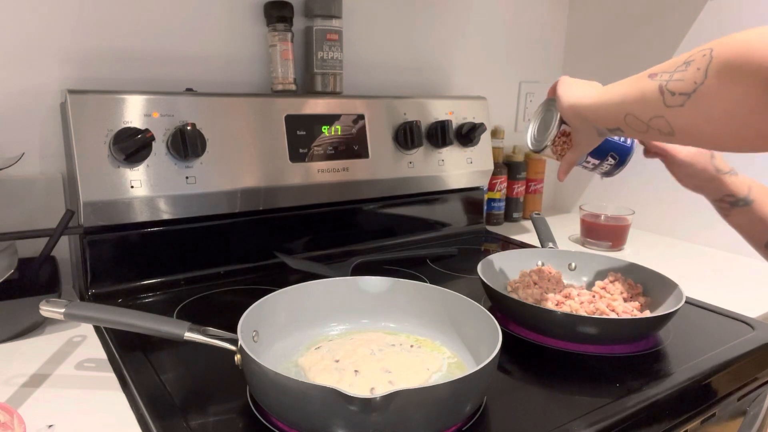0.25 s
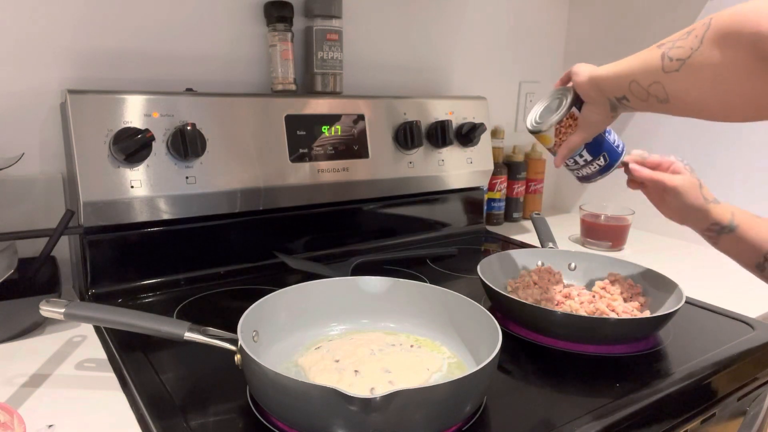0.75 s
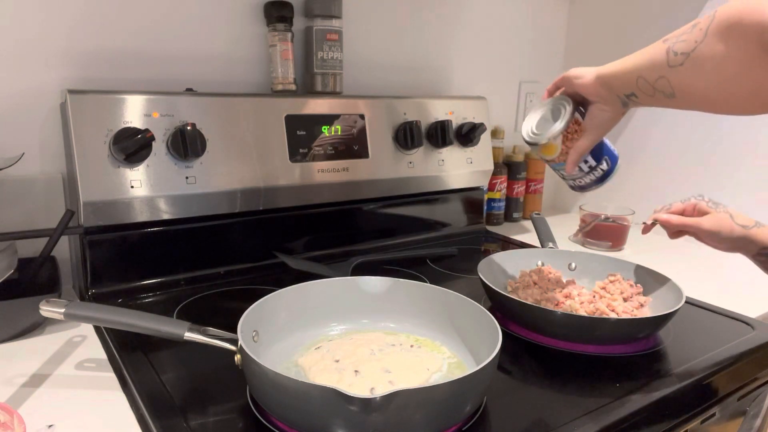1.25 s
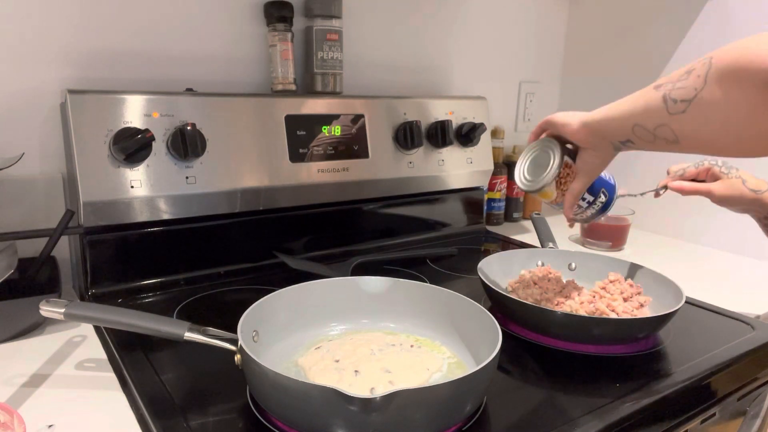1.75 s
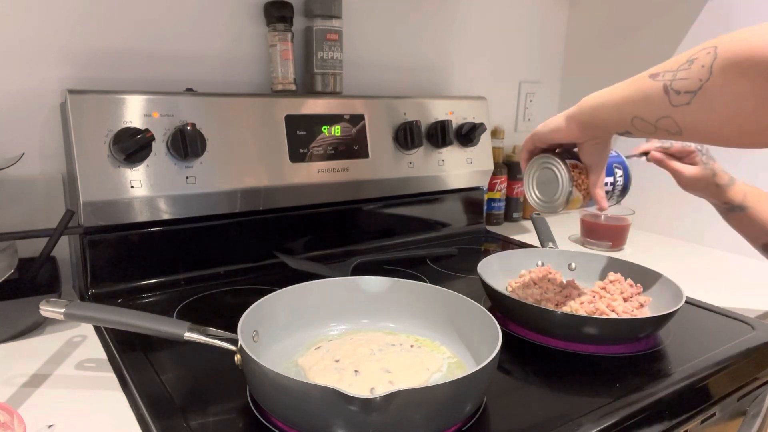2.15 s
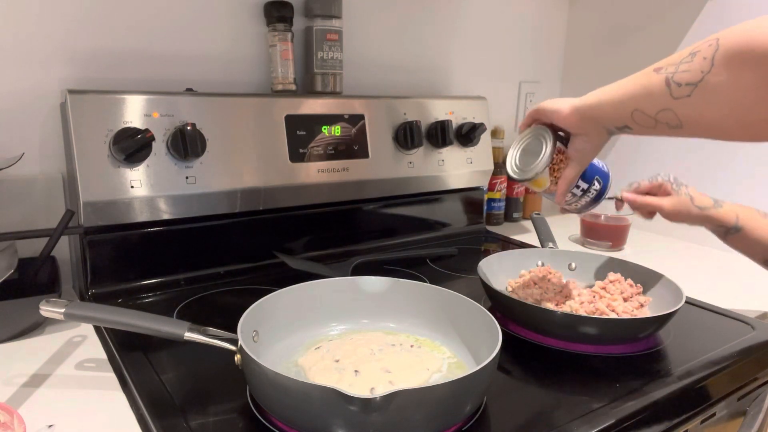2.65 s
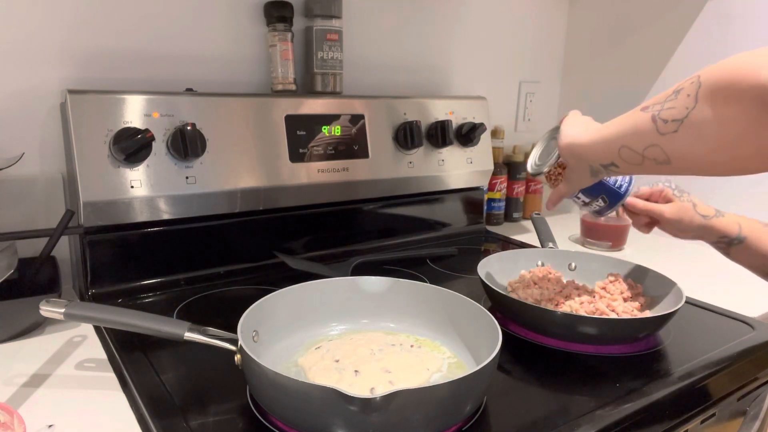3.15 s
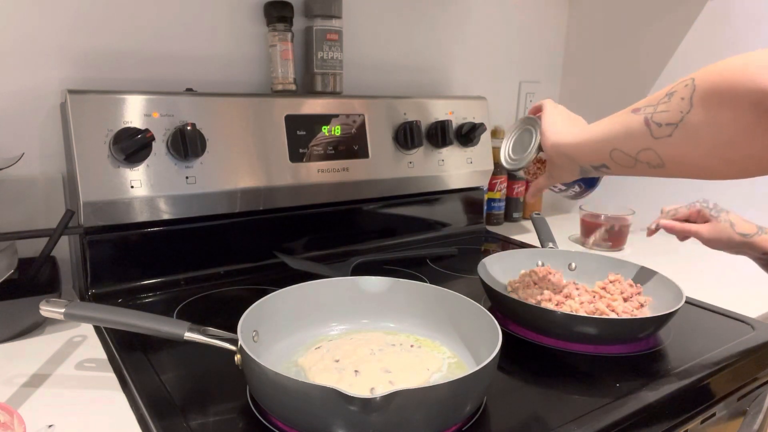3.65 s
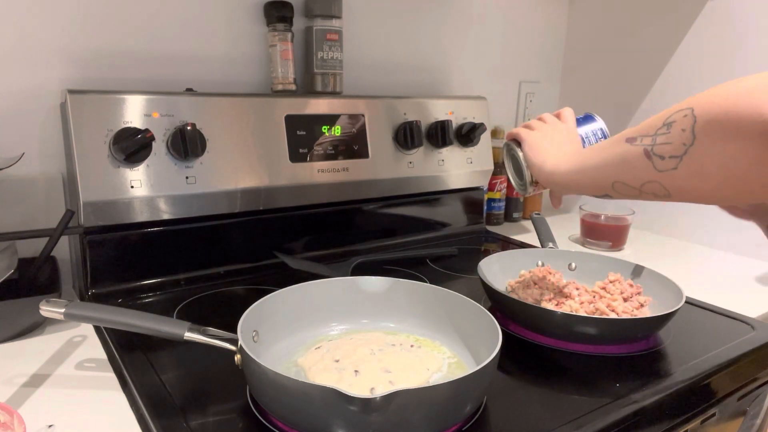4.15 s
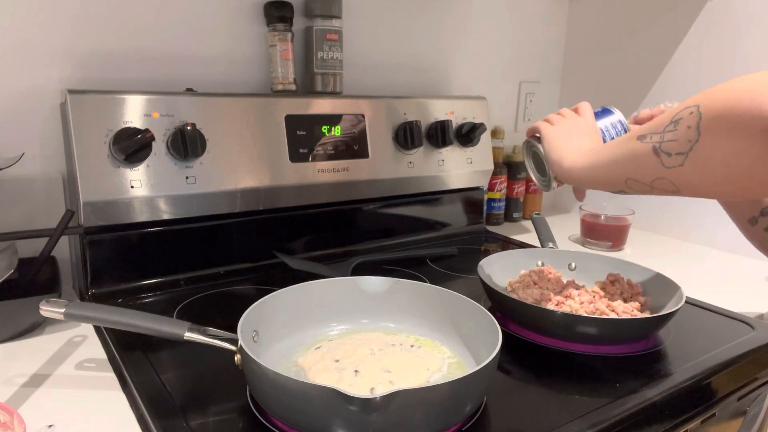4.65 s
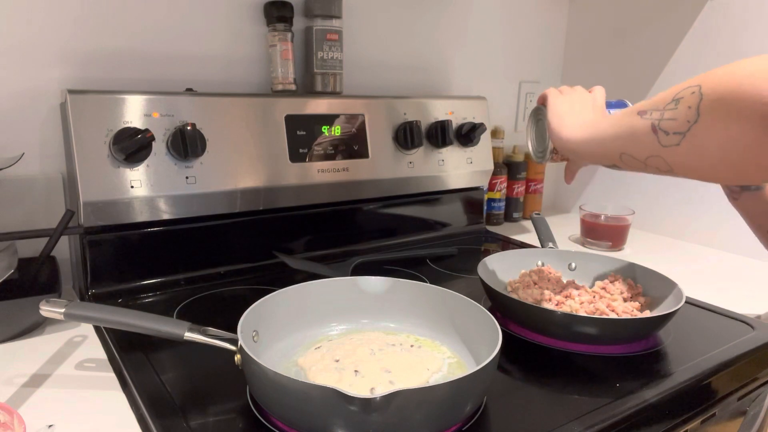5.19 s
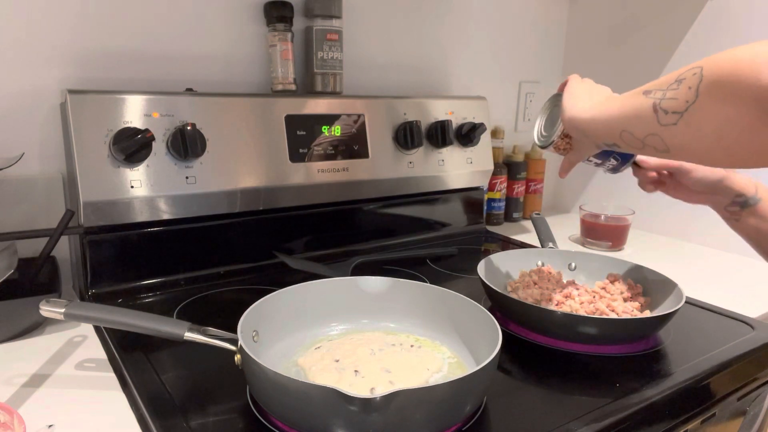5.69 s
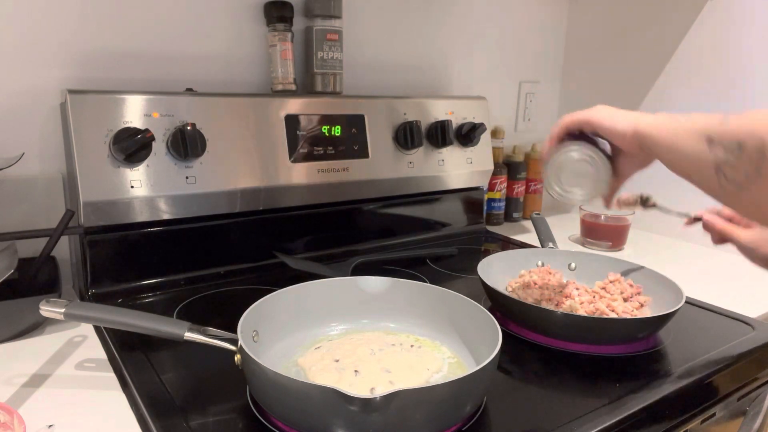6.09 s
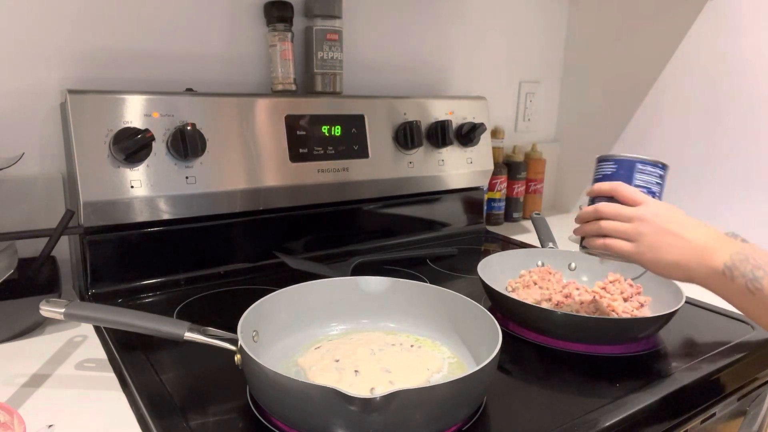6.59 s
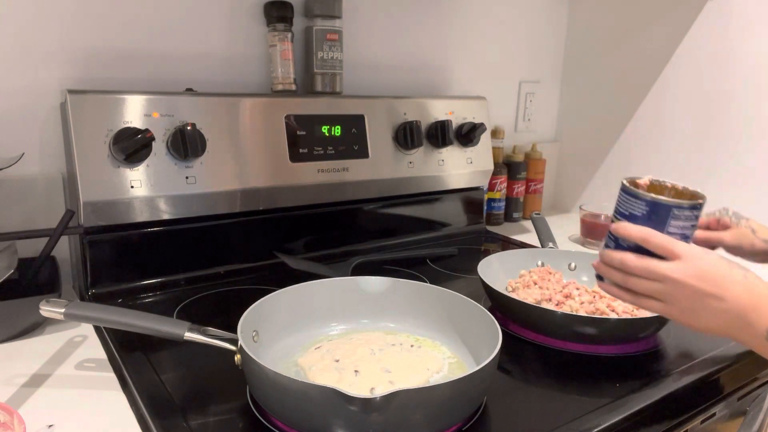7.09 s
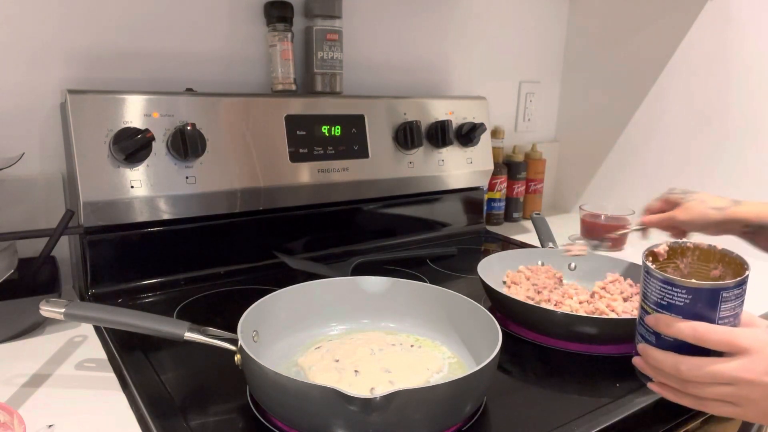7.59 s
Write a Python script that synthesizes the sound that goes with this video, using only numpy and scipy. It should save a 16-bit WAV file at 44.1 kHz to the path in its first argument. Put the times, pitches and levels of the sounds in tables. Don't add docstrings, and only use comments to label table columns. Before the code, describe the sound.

A close stereo pickup in a hard-surfaced kitchen, with soft room air and a faint low appliance hum that wavers. From 0 to 1 s a metal spoon scratches and taps inside a half-empty can, with a rougher scrape at 0.8. A clear hollow clank lands at 1.4, then a lull. From 2.05 to 2.65 knocks quicken into a bright tinny cluster, the strongest at 2.6; another dull knock comes at 3.0, followed by small scrapes until 3.4. After a quiet second, tinny clinks return at 4.5-4.85. More clanks gather at 5.35-5.45, with a tap at 5.64 and a short bright scrape at 5.75. After a pause, six much louder raps on the pan's rim run from 6.18 to 6.97, about 0.16 s apart, clangy with short ring and low thud, the last hardest. The ring fades into the room; barely audible can touches follow at 7.45 and 7.75.

```python
import sys
import numpy as np
from scipy import signal
from scipy.fft import rfft, irfft
from scipy.io import wavfile
from scipy.ndimage import uniform_filter1d

SR = 44100
rng = np.random.default_rng(int(sys.argv[2]) if len(sys.argv) > 2 else 0)


def volts_from_decibels(level):
    exponent = np.asarray(level, float) / 20
    return 10 ** exponent


def materialize(psi):
    bounded = np.clip(np.atleast_2d(psi).T, -1, 1)
    quanta = np.round(bounded * 32767).astype(np.int16)
    wavfile.write(sys.argv[1], SR, quanta)


N = 345303

# (frequency [Hz], density [dB per Hz])
AIR_SPECTRUM = [(15, -54.5), (30, -23), (59, -1.5), (130, -16), (217, -17.5), (330, -22), (560, -28),
                (840, -21), (1330, -35), (2200, -44), (3600, -49), (7500, -49.5), (10700, -50),
                (14500, -59.5)]
# (frequency [Hz], likeness [-1..1])
AIR_SAME = [(60, 0.92), (180, 0.77), (550, 0.047), (1650, -0.16), (4970, -0.36), (15000, 0.76)]
# (time [s], level [dB])
HUM_LEVEL = [(0.0, -45), (0.15, -40), (1.92, -60.5), (3.55, -37.5), (3.88, -65), (5.91, -66), (6.46, -34.5),
             (7.74, -49.5), (7.83, -71.5)]

# (frequency [Hz], t60 [s])
KITCHEN_T60 = [(150, 0.61), (600, 0.77), (2500, 0.85), (6000, 0.7), (12000, 0.43)]
# (frequency [Hz], likeness [0..1])
TAIL_SAME = [(100, 0.8), (300, 0.55), (800, 0.2), (4000, 0.1), (8000, 0.63), (12000, 1)]
# (frequency [Hz], level [dB])
COUNTER = [(150, -11.5), (400, -2.5), (700, -4.5), (1400, -5), (5000, -0.5), (12000, -5.5)]
# (frequency [Hz], likeness [0..1])
COUNTER_SAME = [(200, 0.61), (700, 0.43), (1500, 0.57), (4000, .3), (8000, 0.68), (13000, 0.83)]
# (frequency [Hz], phase [rad])
CAN_PHASE = [(100, 0), (1400, .9), (2100, 2.2), (2800, 4.2), (3500, 5.2), (6200, 5.4), (7000, 3.6),
             (8300, 2.7), (11500, .1), (14500, -2.9)]
# (frequency [Hz], phase [rad])
PAN_PHASE = [(100, 0), (700, .7), (1400, 1.5), (2100, 2), (3400, 2.1), (6500, 2.2), (8300, 2.5),
             (10300, 1.1), (12400, -.3), (14500, -2.1)]

# (time [s], blow [dB], thud [dB], tick [dB], clink of the spoon [dB])
RAPS = [
    (6.183, -8, -23, -34, -13),
    (6.3533, -6, -19.5, -20, -15),
    (6.5205, -4, -20.5, -17.5, -19),
    (6.6826, -7.5, -25.5, -25, -11.5),
    (6.8405, -4.5, -21.5, -21.5, -17),
    (6.9673, -3, -21.5, -14.5, -18.5),
]
# (frequency [Hz], level [dB], t60 [s])
PAN_LOW = [(236.8, 4, 0.18), (304, -14.5, 0.15), (143, -0.5, 0.11), (196, 0, 0.14), (503.9, -10.5, 0.48),
           (598, -10.5, 0.19)]
# (frequency [Hz], level [dB], t60 [s])
PAN_BOWL = [(1185, 1.5, 0.16), (1380, -0.5, 0.2), (1495, -4.5, 0.25), (1810, 5.5, 0.22), (2019, 5, 0.2),
            (870, -19, 0.047)]
# (frequency [Hz], level [dB], t60 [s])
PAN_RIM = [(2458, -2.5, 0.2), (2597, -1, 0.2), (2756, -8, 0.2), (3229, -4.5, 0.42), (3180, -14, 0.12),
           (3985, -8, 0.2), (3939, -7, 0.35), (5582, -12, 0.3), (2284, -11, .3), (7316, -8.5, .15),
           (6056, -11, 0.25), (6510, 4, 0.027), (6570, 2.5, 0.09), (6790, 17, 0.044), (7000, -13.5, .1),
           (7605, -12.5, 0.13), (8921, -29, 0.4), (9130, -29.5, .18), (10450, -26.5, 0.54), (11900, -27, 1),
           (12800, -29, 0.096)]
# (frequency [Hz], level [dB], t60 [s])
SPOON = [(4728, -2.5, 0.09), (4724, -15, 0.3), (4797, -23.5, .4)]
# (frequency [Hz], level [dB])
CRACK = [(60, -51.5), (300, -42), (1200, -12.5), (1700, -25), (2500, -13), (3200, -16), (3800, -25),
         (4300, -26.5), (5200, -21.5), (6500, -10), (8300, -26), (11000, -25.5), (13000, -40), (16000, -59)]
# (frequency [Hz], level [dB])
THUD = [(50, -57), (95, -16), (140, -7.5), (240, -5.5), (310, -15.5), (450, -11), (700, -16.5), (1100, -31),
        (2000, -60.5)]
# (frequency [Hz], level [dB])
TICK = [(5000, -35.5), (7500, -0.5), (8300, -0.5), (10000, 0.5), (12000, -8.5), (14000, -10.5),
        (16000, -46.5)]

# (full pressure from [s], held [s], pressure [dB],
# can air above it [dB], fizz above it [dB])
STROKES = [(0.0, 0.0081, -39, -0.5, -1.5), (0.423, 0.026, -30.5, -2.5, 2.5), (.458, 0.025, -38, -7, -5),
           (0.818, 0.092, -25.5, -0.5, -2), (2.359, 0.08, -46, 2, -12), (2.45, 0.023, -41, -7, -9),
           (2.51, 0.045, -56, 16, -21), (3.061, 0.014, -36, 8.5, -12), (3.107, .004, -38, -30, -18),
           (3.28, 0.031, -39.5, -2.5, -9), (3.33, 0.021, -43, 9, -16), (3.362, 0.024, -34, 3, -5.5),
           (4.542, 0.018, -44.5, -22, -22), (4.686, 0.021, -36.5, -32, 1.5), (4.745, .01, -56, -21, -6),
           (4.832, 0.017, -47, -31, 10.5), (5.085, 0.032, -55.5, -21, 2.5), (5.38, .005, -44, -8, -12),
           (5.47, 0.0049, -43, 0, 3), (5.672, 0.0059, -39.5, -9, -4), (5.714, 0.035, -48, -23, -20),
           (5.753, 0.073, -30, -2, 0.5), (7.446, 0.072, -60, -20, 1), (7.715, 0.11, -67.5, -16.5, 1.5)]
# (from [s], length [s], level [dB], frequency [Hz])
WHISTLES = [(0.42, 0.024, -38, 4000), (0.435, 0.055, -44.5, 2350), (0.81, 0.1, -43, 4010),
            (0.81, 0.06, -39.5, 5050), (.862, 0.05, -43.5, 4700), (0.823, 0.077, -49, 6000),
            (0.84, 0.084, -48, 10700), (2.7, 0.021, -49, 2900), (3.335, 0.055, -45, 4670),
            (3.25, 0.11, -56, 830), (3.1, .05, -57, 2650), (3.353, 0.028, -42, 6540),
            (3.35, 0.048, -48, 1020), (1.784, 0.27, -61.5, 730), (1.78, 0.28, -70.5, 1460),
            (4.52, 0.076, -58, 400), (5.638, 0.046, -46.5, 370), (4.676, 0.021, -38.5, 3700),
            (4.724, 0.16, -51.5, 2870), (4.696, 0.031, -39.5, 4600), (4.81, 0.024, -50, 5570),
            (5.705, 0.024, -50, 5700), (5.752, 0.038, -47, 5400), (5.764, 0.075, -42, 4200),
            (5.76, .08, -45.5, 3750), (5.77, .07, -46, 5500), (5.769, 0.041, -55.5, 6550)]
# (frequency [Hz], level [dB], t60 [s])
STROKE_AIR = [(680, 0, .07)]
# (frequency [Hz], level [dB])
RASP = [(65, -46), (110, -11.5), (251, -20), (415, -8.5), (520, -20), (638, -5), (736, -14.5), (835, -24),
        (1020, -24.5), (1400, -24.5), (2200, -18.5), (2980, -20.5), (4840, -24.5), (8000, -40.5),
        (10400, -31), (17600, -120)]
# (frequency [Hz], level [dB])
FIZZ = [(5000, -27.5), (5900, -15), (6900, -5.5), (7500, -3), (8600, -2), (9400, -0.5), (10300, -4),
        (12000, -10), (14000, -10), (16000, -40)]

# (time [s], blow [dB], can air above it, by depth of the spoon [dB],
# tick above it, by how much edge meets the wall [dB])
KNOCKS = [(0.2608, -47.5, -7, -20), (0.3381, -29.5, -3.5, -4), (0.4174, -27, -11, -1.5),
          (0.7472, -24, 0.5, -8.5), (0.943, -30.5, 3.5, -15), (1.4166, -20.5, -1, -8.5),
          (2.0622, -32, -7, -28), (2.1074, -27, -6.5, -11.5), (2.3331, -31.5, -3, -7),
          (2.5581, -26.5, -1, -9.5), (2.5785, -25.5, -3, -6.5), (2.6224, -18.5, -6.5, -7),
          (2.9851, -19, -7.5, -15), (3.048, -35.5, -1, -1.5), (3.1318, -27, -10.5, -10.5),
          (3.254, -38, -2.5, -12), (4.5191, -32.5, -12.5, -14), (4.5966, -37, -8, -5),
          (4.6083, -28, -1, -6), (4.6845, -34.5, -30, 3.5), (4.7111, -30, -36, -6), (5.1124, -43, -28, -25),
          (5.3058, -56, -9, -8), (5.3608, -25, -5.5, -27), (5.408, -37, -28, -6), (5.416, -27.5, -26, 0),
          (5.435, -22, 1, -11.5), (5.6396, -26, -5.5, -9), (6.0794, -60, -63, 0),
          (7.462, -56.5, -19.5, 8.5), (7.7892, -55, -17, -1.5)]
# (time [s], low mode [dB], its pitch [Hz], high mode [dB], its pitch [Hz])
CLANKS = [(0.34, -58, 1790, -61, 2600), (0.748, -49, 1520, -62.5, 2660), (1.4158, -27, 1385, -26.5, 2580),
          (2.064, -56.5, 1450, -60, 2870), (2.11, -56, 1515, -59, 2780), (2.332, -52.5, 1460, -75, 2900),
          (2.556, -40, 1587, -41.5, 2510), (2.581, -37.5, 1491, -46, 2265), (2.6216, -26, 1590, -22, 2430),
          (2.9836, -49, 1450, -44, 2400), (4.52, -48.5, 1505, -59, 2770), (4.6108, -23, 1550, -27.5, 2700),
          (4.6843, -66, 1580, -30.5, 2540), (4.7095, -37, 1570, -37, 2624), (5.3611, -26, 1540, -30, 2740),
          (5.4065, -35, 1495, -39, 2770), (5.437, -31, 1600, -25, 2550), (5.639, -32.5, 1784, -50, 2450)]
# (time [s], level [dB], pitch [Hz], level [dB], pitch [Hz])
PINGS = [(0.3386, -42.5, 5020, -50, 5500), (0.4183, -35, 3980, -45, 7330.0), (0.7467, -35, 4150, -44, 4870),
         (0.7466, -50, 5170, -46, 7350.0), (0.9425, -43, 3810.0, -58, 5000),
         (1.417, -32.5, 4570, -31.5, 5180), (1.4146, -35, 6550, -36, 7470), (2.0638, -44, 4520, -60, 5370),
         (2.1078, -52.5, 4450, -41.5, 5000), (2.3331, -53, 4340, -46, 4770), (2.433, -46, 3770, -52, 4650),
         (2.455, -56, 4290.0, -55, 4800), (2.472, -46, 3880, -53, 4670.0),
         (2.5581, -57, 3290.0, -57, 4330.0), (2.5593, -36, 4960, -51, 5400),
         (2.5785, -35.5, 3420, -49, 4280), (2.5783, -30.5, 5050, -50, 5360),
         (2.6213, -32.5, 3890, -37, 4230), (2.6224, -37, 4820, -37, 5270), (2.984, -41, 4900, -32, 5260),
         (2.985, -38, 6100, -36, 6900), (3.0609, -56, 4900, -58, 5450), (3.1318, -59, 4300.0, -56.5, 4700),
         (3.256, -63, 4570.0, -73, 5640), (4.5167, -59, 3860, -59, 5270), (4.598, -41, 3040, -58, 4300),
         (4.608, -32.5, 3060, -36, 4370.0), (4.6083, -38, 4970, -40, 7260), (4.6845, -44, 3700, -50, 4370),
         (4.6838, -37.5, 5270, -49, 7440), (4.7111, -40, 3520, -50, 3950.0),
         (4.7096, -50, 4560.0, -45, 7300), (5.363, -36, 3160.0, -35, 3900), (5.36, -35, 4400, -41, 5430),
         (5.408, -49, 3730, -49, 5000), (5.415, -32, 3920, -45, 4690.0), (5.435, -34, 3860.0, -42, 4370),
         (5.434, -31, 4770, -39, 6960), (5.641, -51, 4150, -39, 5860), (5.6396, -47, 6130, -49, 7000)]
# (time [s], frequency [Hz], level [dB], t60 [s])
RINGS = [(1.4172, 2560, -42, 0.39), (1.4162, 5000, -50, 0.35), (4.6092, 1500, -45.5, 0.61),
         (4.6093, 4900, -55, .3), (4.611, 388, -38, 0.09), (4.7102, 3700, -60, 0.51),
         (5.3602, 1485, -41, 0.34), (5.4362, 2420, -31.5, 0.27), (1.76, 3670, -73, 1.13),
         (1.4172, 5130, -53.5, .3), (1.4172, 1600, -50.5, 0.3), (0.0011, 3340, -57.5, 0.35),
         (3.052, 1014, -51, 0.13), (2.6224, 2430, -42, 0.3), (2.9, 4800, -70, 0.23), (3.1, 8400, -63, 0.32)]
# (share of the pitch, level [dB], t60 [s])
LOW_WALL = [(1, 0, .045), (.93, -5, .04), (1.06, -6, .04)]
# (share of the pitch, level [dB], t60 [s])
HIGH_WALL = [(1, 0, .04), (1.06, -3, .035), (.94, -3, .04)]
# (frequency [Hz], level [dB], t60 [s])
CAN_RIM = [(3510, -17, 0.0109), (4100, 10.5, 0.048), (4370, -1, 0.013), (4600, -13, 0.012),
           (5000, -7.5, 0.045), (5270, 0.5, 0.03), (5000, -28, 0.023), (6950, 29.5, 0.0062)]
# (frequency [Hz], level [dB])
SNAP = [(200, -36), (420, -21), (560, -26), (850, -9), (1300, -24), (2000, -12.5), (3000, -16), (5000, -12),
        (7000, -19), (10000, -20), (16000, -58.5)]


def evened(x):
    return x / np.sqrt(np.mean(x ** 2) + 1e-20)


def read(points, hz):
    f, value = np.transpose(points)
    return np.interp(np.log(hz + 1), np.log(f + 1), value)


def add(mix, s, sound):
    part = mix[round(s * SR):][:len(sound)]
    part += sound[:len(part)]


def coloured(x, spectrum):
    hz = np.fft.rfftfreq(len(x), 1 / SR)
    return irfft(rfft(x) * volts_from_decibels(read(spectrum, hz)), len(x))


def resonate(x, hz, width):
    turn = np.exp(2j * np.pi * np.cumsum(hz * np.ones(len(x))) / SR)
    r = np.exp(-np.pi * width / SR)
    return 2 * (turn * signal.lfilter([1 - r], [1, -r], x / turn)).real


def ring(modes, t, spread_db, detune, pitch=1):
    hz, db, t60 = np.transpose(modes)[:, :, None]
    chance = rng.standard_normal((2, len(modes), 1))
    sines = np.sin(2 * np.pi * pitch * hz * (1 + detune * chance[0]) * t)
    decay = volts_from_decibels(db + spread_db * chance[1] - 60 * t / t60)
    return (decay * sines).sum(0) / np.sqrt((volts_from_decibels(db) ** 2).sum())


def splash(spectrum, t, t60):
    return evened(coloured(rng.standard_normal(len(t)), spectrum)) * volts_from_decibels(-60 * t / t60)


def mixed(left, other, same):
    return np.array([left, same * left + np.sqrt(1 - same ** 2) * other])


def room_air():
    frames, hz = N // 512 + 5, np.fft.rfftfreq(2048, 1 / SR)
    a, b, c, d, patches = rng.standard_normal((frames, 1025, 5)).T
    patches = evened(uniform_filter1d(uniform_filter1d(patches, 12, 0), 10, 1))
    same = np.clip(read(AIR_SAME, hz), -1, 1)[:, None]
    z = mixed(a + 1j * b, c + 1j * d, same)
    z *= volts_from_decibels(read(AIR_SPECTRUM, hz)[:, None] + 2.4 * patches)
    return volts_from_decibels(-51) * evened(signal.istft(z, nperseg=2048, noverlap=1536)[1][:, :N])


def appliance_hum():
    pitch_hz, width_hz = 53.3, 9.9
    s, db = np.transpose(HUM_LEVEL)
    drone = rng.standard_normal(N)
    for _ in range(2):
        drone = resonate(drone, pitch_hz, width_hz)
    load = volts_from_decibels(np.interp(np.arange(N) / SR, s, db) - 6.5)
    return load * evened(drone) * volts_from_decibels(np.array([[.7], [-.7]]))


def kitchen(x, phase, near_db, near_t60, far_db):
    taps = np.zeros((2, SR))
    at = np.arange(300, SR - 20, 20) + rng.integers(0, 20, (2, (SR - 301) // 20))
    np.put_along_axis(taps, at, rng.choice([-1., 1.], at.shape), 1)
    hz, t, z = signal.stft(taps, SR, nperseg=256)
    z = mixed(z[0], z[1], np.clip(read(TAIL_SAME, hz), 0, 1)[:, None])
    decay = volts_from_decibels(-60 * t / read(KITCHEN_T60, hz)[:, None])
    tail = signal.istft(z * decay, SR, nperseg=256)[1][:, :SR]

    near = rng.integers(30, 700, (2, 24))
    near_level = volts_from_decibels(near_db - 60 * near / SR / near_t60)
    echoes = np.zeros((2, SR))
    np.put_along_axis(echoes, near, near_level * rng.choice([-1., 1.], (2, 24)), 1)
    hz, echoes = np.fft.rfftfreq(SR, 1 / SR), rfft(echoes)
    same = np.clip(read(COUNTER_SAME, hz), 0, 1)
    echoes = volts_from_decibels(read(COUNTER, hz)) * mixed(echoes[0], echoes[1], same)

    path = 1 + echoes + rfft(volts_from_decibels(far_db) * tail / np.linalg.norm(tail[0]))
    path = path * np.exp(1j * np.array([[0], [1]]) * read(phase, hz))
    path = np.roll(irfft(path, SR), 256, 1)
    return signal.fftconvolve(x[None], path, axes=1)[:, 256:N + 256]


def pan_raps():
    out, t = np.zeros(N), np.arange(SR * 3 // 4) / SR
    for s, blow_db, thud_db, tick_db, clink_db in RAPS:
        rim = 0.79 * ring(PAN_RIM, t, 1.0, 0.0009)
        rim += 1.39 * splash(CRACK, t, 0.033) + 0.055 * splash(CRACK, t, 0.45)
        rim *= 1 - np.exp(-t / 0.00071)
        bowl = ring(PAN_BOWL, t, 1.0, .001) * (1 - np.exp(-t / 0.002))
        clink = ring(SPOON, t, 0, 0.0013)
        thud = 1.22 * ring(PAN_LOW, t, 1, 0.003) + 0.99 * splash(THUD, t, 0.14)
        thud *= 1 - np.exp(-(t / 0.018) ** 2)
        tick = splash(TICK, t, 0.031) * (1 + 1.2 * np.exp(-t / .0008))
        metal = volts_from_decibels(blow_db - 7.0) * rim + volts_from_decibels(thud_db - 3) * bowl + volts_from_decibels(clink_db - 3.5) * clink
        add(out, s, metal + volts_from_decibels(thud_db + 5.5) * thud + volts_from_decibels(tick_db) * tick)
    return out


def can_strokes():
    press_db_per_s, lift_db_per_s, sag_db = 604, 446, 2
    sing_hz, sing_sweep_hz_per_s = 5000, -5000
    slips = volts_from_decibels(2.4 * np.minimum(rng.exponential(1, N), 3)) * rng.standard_normal(N)
    slips *= rng.random(N) < 5000 / SR
    judder = volts_from_decibels(1.1 * evened(uniform_filter1d(rng.standard_normal(N), 200)))
    drive = judder * (evened(slips) + 0.68 * rng.standard_normal(N))

    body = sum(volts_from_decibels(db) * resonate(drive, hz, 2.3 / t60 + 60) for hz, db, t60 in CAN_RIM[1:])
    wall = evened(evened(coloured(drive, RASP)) + .5 * evened(body))
    air = np.zeros(N)
    for hz, db, t60 in STROKE_AIR:
        air += volts_from_decibels(db) * 1.3 * resonate(resonate(drive, hz, 150), hz, 120)
    air = evened(air)
    fizz = evened(coloured(drive, FIZZ))

    out = np.zeros(N)
    for s, held, top_db, air_db, fizz_db in STROKES:
        start = max(round(s * SR) - SR // 10, 0)
        at = slice(start, round((s + held) * SR) + SR // 5)
        t = np.arange(N)[at] / SR - s
        eased_db = sag_db * np.clip(t / held, 0, 1) + lift_db_per_s * np.maximum(t - held, 0)
        press_db = top_db + press_db_per_s * np.minimum(t, 0) - eased_db
        edge = 0.53 * evened(resonate(drive[at], sing_hz + sing_sweep_hz_per_s * t, 600))
        sound = wall[at] + edge + volts_from_decibels(air_db + 1.5) * air[at] + volts_from_decibels(fizz_db) * fizz[at]
        add(out, start / SR, volts_from_decibels(press_db - 10.5) * sound)
    for s, length, db, hz in WHISTLES:
        part = drive[round(s * SR):][:round(length * SR)]
        whistle = evened(resonate(resonate(part, hz, 560), hz, 560))
        add(out, s, volts_from_decibels(db) * np.sqrt(np.hanning(len(part))) * whistle)
    return out


def can_knocks():
    air_hz, air_drift = 678.6, 0.0031
    ping_t60, ping_db = 0.026, 4
    out, t = np.zeros(N), np.arange(SR // 5) / SR
    for s, blow_db, air_db, tick_db in KNOCKS:
        rim = 0.89 * ring(CAN_RIM, t, 7.0, 0.012) + 1.28 * splash(SNAP, t, 0.019)
        air = ring([(air_hz, 0, .036)], t, 0, air_drift) * (1 - np.exp(-t / 0.0022))
        tick = splash(TICK, t, 0.026)
        add(out, s, volts_from_decibels(blow_db) * (volts_from_decibels(-9.5) * rim + volts_from_decibels(air_db + 10.0) * air + volts_from_decibels(tick_db) * tick))
    for s, low_db, low_hz, high_db, high_hz in CLANKS:
        free = max(1 + 0.22 * (-26.5 - max(low_db, high_db)), .3)
        low = ring(LOW_WALL, t / free, 0.83, 0.0055, low_hz * free)
        high = ring(HIGH_WALL, t / free, 2.5, 0.006, high_hz * free)
        add(out, s, volts_from_decibels(low_db - 2.5) * low + volts_from_decibels(high_db + 1.0) * high)
    for s, low_db, low_hz, high_db, high_hz in PINGS:
        for db, hz in [(low_db, low_hz), (high_db, high_hz)]:
            ping = ring([(hz, 0, ping_t60), (hz * 0.93, -6, ping_t60)], t, 0, 0)
            add(out, s, volts_from_decibels(db + ping_db) * ping)
    t = np.arange(SR // 2) / SR
    for s, hz, db, t60 in RINGS:
        add(out, s, volts_from_decibels(db) * ring([(hz, 0, t60), (hz * 1.014, -3, t60)], t, 0, 0))
    return out


def scene():
    can = kitchen(can_knocks() + can_strokes(), CAN_PHASE, -2.0, 0.044, -5.5)
    pan = kitchen(pan_raps(), PAN_PHASE, -1.0, 0.045, -2.8)
    return can + pan + room_air() + appliance_hum()


def low_pass(x):
    return signal.sosfilt(signal.butter(12, 16750, fs=SR, output="sos"), x)


def record(dry):
    edge = signal.butter(N=14, Wn=17000, fs=SR, output="sos")
    heard = signal.sosfilt(edge, dry)
    lead = rng.standard_normal(700) * volts_from_decibels(-60 * np.arange(700) / SR / 0.024)
    lead = lead[None] / np.linalg.norm(lead)
    smear = signal.fftconvolve(heard[:, ::-1], lead, axes=1)[:, :N][:, ::-1]
    band = signal.butter(N=2, Wn=[700, 8000], btype="band", fs=SR, output="sos")
    heard = heard + volts_from_decibels(-12.5) * signal.sosfilt(band, smear)
    limited = np.tanh(heard / 1.3) * 1.4
    top = signal.cheby2(N=10, rs=70, Wn=16600, fs=SR, output="sos")
    return low_pass(signal.sosfilt(top, limited))


dry = scene()
out = record(dry)
materialize(out)
```